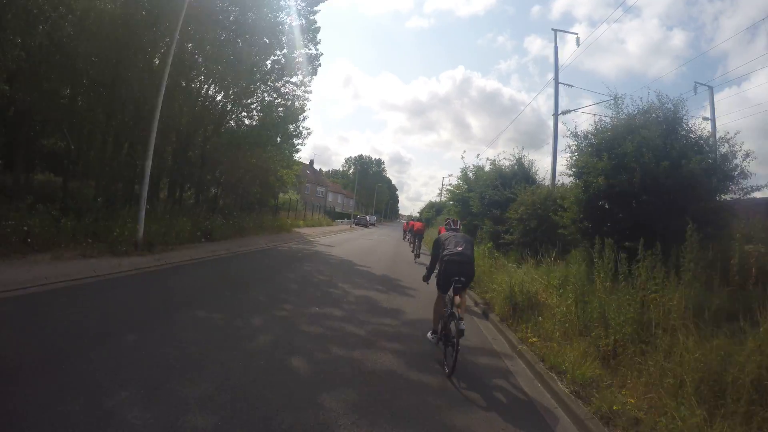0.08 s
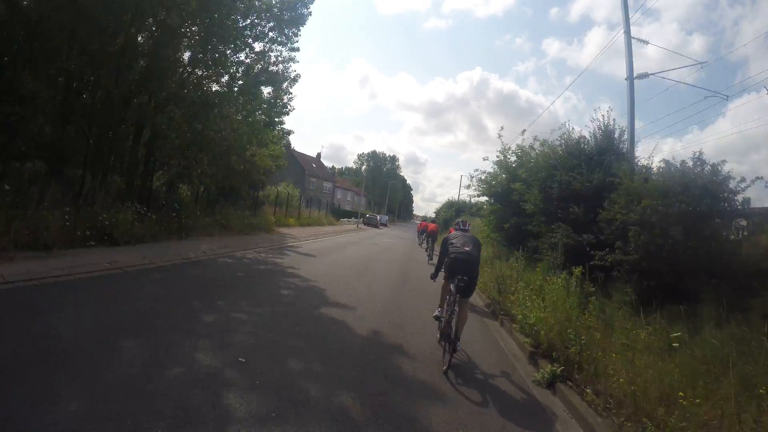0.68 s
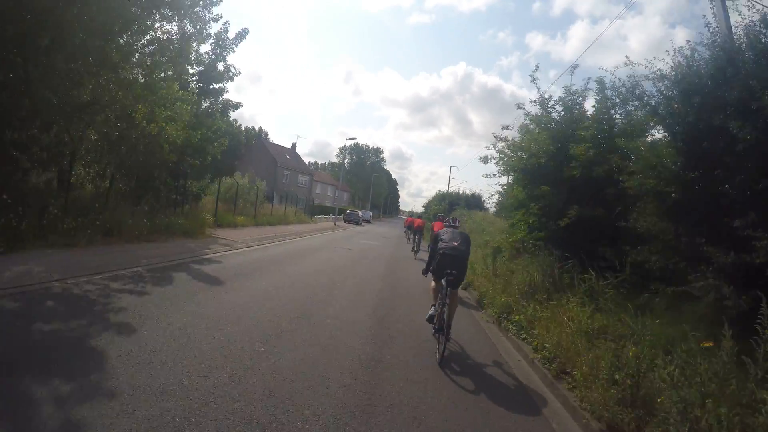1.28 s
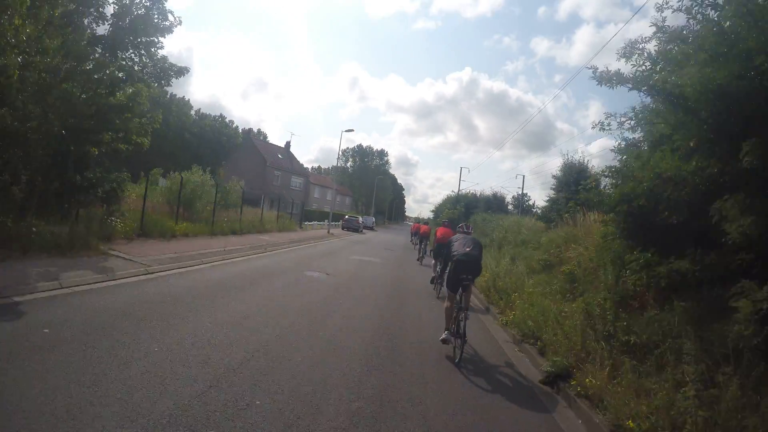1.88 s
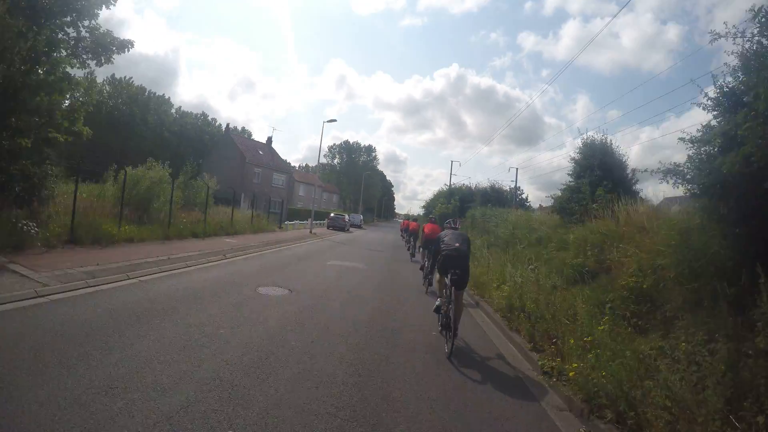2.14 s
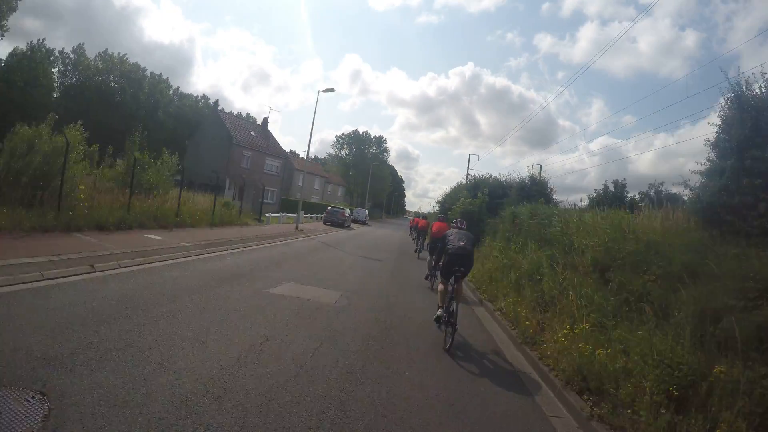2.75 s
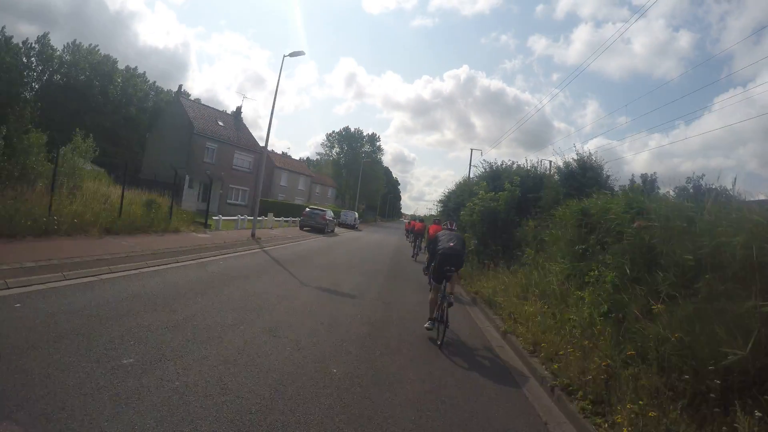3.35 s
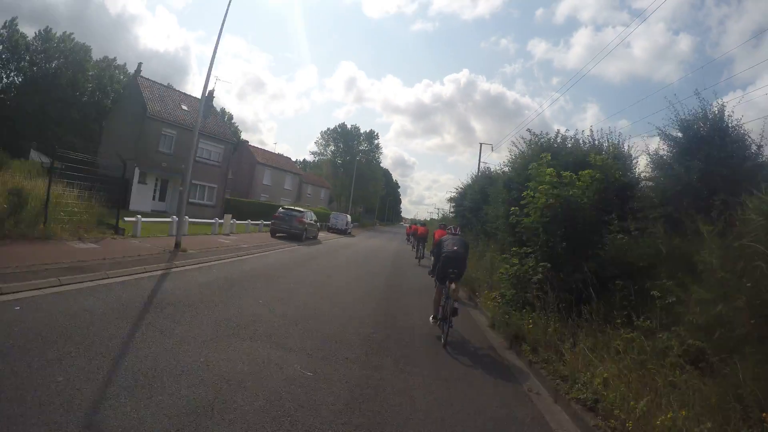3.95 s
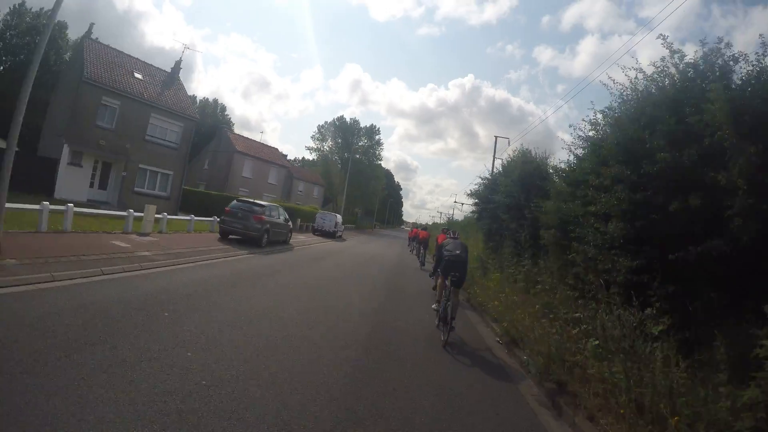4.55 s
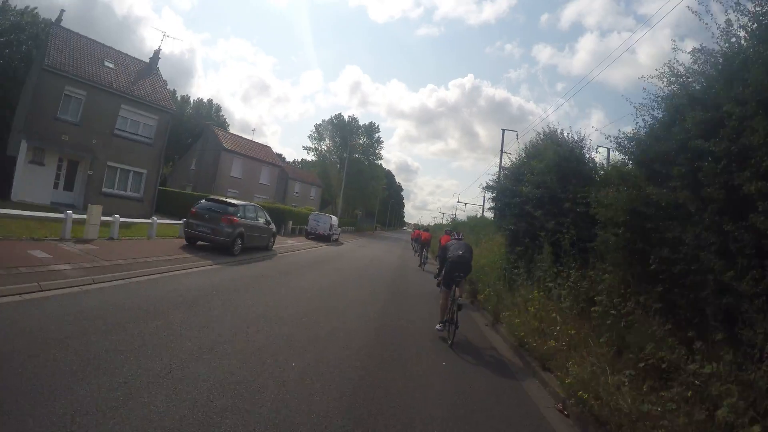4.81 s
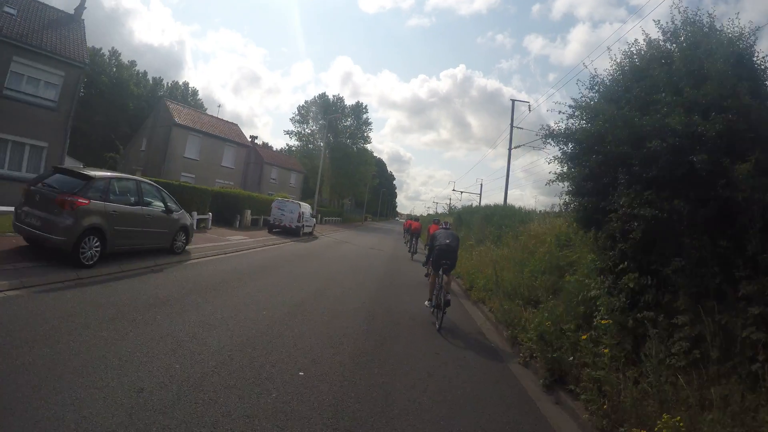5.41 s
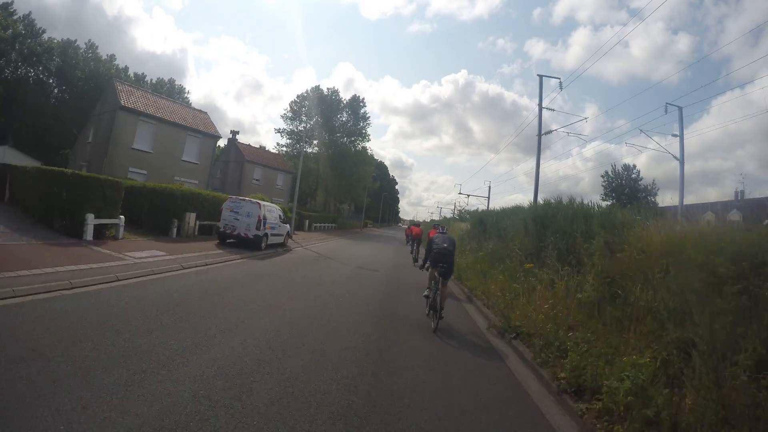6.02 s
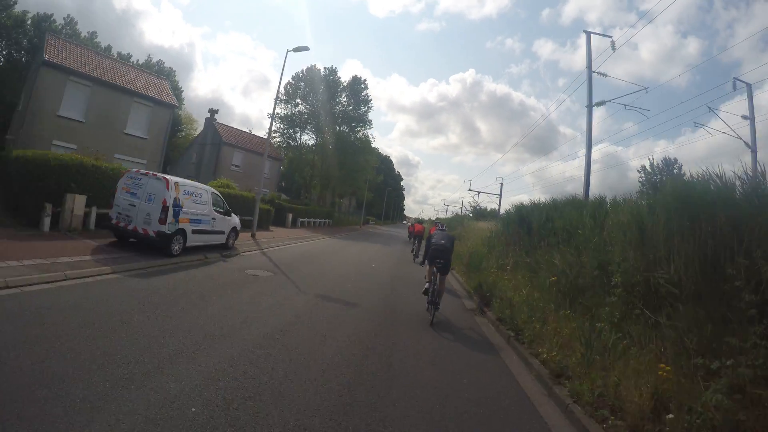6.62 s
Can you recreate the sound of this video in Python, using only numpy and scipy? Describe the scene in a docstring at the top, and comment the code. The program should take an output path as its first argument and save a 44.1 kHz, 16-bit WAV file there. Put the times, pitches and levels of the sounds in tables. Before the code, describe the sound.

Low, gusty wind buffets a microphone mounted on a moving bicycle, over the steady rush and hum of tyres on asphalt. A bright swish fades away at the start. Something close by ticks lightly on many of the wheel turns. In the second half, a few bumps make the mount clack sharply, the loudest with a strong gust. A thin hiss of air lies underneath.

```python
"""Wind buffets the microphone over a rush of tyres, and a bright swish fades away at the start.
The microphone is in a camera's plastic case, mounted on a bicycle behind a group of riders on asphalt.
Road grain drums up through the frame, and coarse patches make the tread sing. Close by, something
ticks lightly on many of the wheel turns, and late on a few bumps make the mount clack.
Underneath lie the hiss of air on the case and the camera's faint whine."""
import sys
import numpy as np
from scipy import signal
from scipy.fft import rfft, irfft
from scipy.io import wavfile
from scipy.ndimage import uniform_filter1d

SR = 44100
rng = np.random.default_rng(int(sys.argv[2]) if len(sys.argv) > 2 else 0)


def materialize(psi):
    """Save the field psi as 16-bit PCM at rate SR to the path in sys.argv[1].

    A 1-D psi becomes a single channel; in a 2-D psi each row is a channel.
    """
    bounded = np.clip(np.atleast_2d(psi).T, -1, 1)
    quanta = np.round(bounded * 32767).astype(np.int16)
    wavfile.write(sys.argv[1], SR, quanta)


N = 295029
T = np.arange(N) / SR
HZ = np.fft.rfftfreq(N, 1 / SR)


def wind(large_db=-43, small_db=-56.5, lump_db=1.0, puff_db=1.3):
    """Headwind and gusts push right on the case: large eddies come in lumps, small ones in puffs."""
    # spectra of the large and of the small eddies: f/Hz, relative level/dB
    large_spectrum = [(4, -3), (12, -4), (24, 4.5), (38, -2), (52, -10.5), (75, -26.5), (120, -38),
                      (400, -73)]
    small_spectrum = [(25, -32), (50, -0.5), (70, 0.5), (110, -6.5), (160, -14), (250, -25.5), (600, -38),
                      (2000, -69)]
    # gusts on top of the headwind: peak t/s, half length/s, large eddy level/dB, small eddy level/dB
    gusts = [(0.284, 0.094, -44, -55), (0.69, 0.061, -37, -60), (1.38, 0.47, -40.5, -64),
             (2.388, 0.1, -39, -66), (2.63, 0.093, -41, -64), (3.18, 0.12, -38.5, -51),
             (3.597, 0.19, -36.5, -51.5), (4.24, 0.11, -36, -70), (4.752, 0.13, -30.5, -44),
             (5.285, 0.23, -42, -53.5), (5.658, 0.049, -37.5, -55), (6.157, 0.23, -42, -51)]
    large_power = amp(large_db) ** 2 + sum((amp(db) * bell(s, half)) ** 2 for s, half, db, _ in gusts)
    small_power = amp(small_db) ** 2 + sum((amp(db) * bell(s, half)) ** 2 for s, half, _, db in gusts)
    buffet = amp(lump_db * drift(14)) * np.sqrt(large_power) * eddies(large_spectrum, even_s=0.13)
    flutter = amp(puff_db * drift(5)) * np.sqrt(small_power) * eddies(small_spectrum, even_s=0.22)
    return buffet + flutter


def eddies(spectrum, even_s):
    """Turbulent pressure whose strength stays even over times longer than even_s."""
    pressure = colour(noise(), spectrum)
    local_power = uniform_filter1d(pressure ** 2, int(even_s * SR))
    return unit(pressure / np.sqrt(local_power + .05))


def rolling(drum_db=-8.0, sing_db=-5.0, usual_road_db=-51, grit=0.34, chips_per_s=600):
    """Below the microphone, tread and stone chips rush, the frame drums and coarse asphalt sings."""
    # loudness of the tyres as the asphalt changes: t/s, level/dB
    asphalt = [(0.0, -50), (1.2, -50.5), (2.2, -52.5), (2.65, -50.5), (3.0, -53), (3.75, -54.5),
               (4.05, -52.5), (4.3, -53.5), (4.7, -52.5), (5.15, -53.5), (5.55, -51), (6.2, -50.5),
               (6.69, -52)]
    # coarse patches: middle t/s, half length/s, rise of the tyre level/dB, extra rise of the drumming/dB
    patches = [(0.15, 0.091, 1, 3), (1.01, 0.043, 0.6, 5), (1.43, .07, 2, -3.5), (2.787, 0.033, 2, 1),
               (3.202, 0.041, 2.5, 1), (3.356, 0.029, 3.5, 3), (4.464, 0.032, 5, 1), (6.14, 0.11, 1.5, 1),
               (6.575, 0.029, 3.5, -0.5)]
    # spectra of tyre rush, frame drumming and tread song: f/Hz, relative level/dB
    rush_spectrum = [(200, -11), (500, -12.5), (690, -9), (800, -1.5), (900, -3.5), (1030, -2.5),
                     (1450, -4.5), (2000, -2.5), (2550, -3), (3050, -12), (3600, -13), (4400, -26.5),
                     (7000, -40.5), (15000, -47)]
    drum_spectrum = [(60, -2.5), (130, 1), (220, -4), (275, -6), (312, -1), (345, 3.5), (410, -4.5),
                     (490, -2.5), (580, -7), (700, -12), (1200, -17.5), (4000, -70)]
    sing_spectrum = [(1000, -42), (1500, -12.5), (1660, 2), (1780, -3), (1920, 3.5), (2120, 0), (2450, -13),
                     (3200, -44)]
    # lower resonances of the case: f/Hz, width/Hz, boost/dB
    case_peaks = [(1670, 150, 4.5), (1920, 107, 1.5), (2035, 200, 2.5)]
    grain = drift(30)  # road grain shakes all three layers together
    patch_db = sum(db * bell(s, half) for s, half, db, _ in patches)
    shake_db = sum(db * bell(s, half) for s, half, _, db in patches)
    road = amp(np.interp(T, *np.transpose(asphalt)) + patch_db)
    chips = noise() * (rng.random(N) < chips_per_s / SR)
    rush = colour(noise() + grit * unit(chips), rush_spectrum, case_peaks) * amp(0.5 * grain)
    drum = colour(noise(), drum_spectrum) * amp(drum_db + shake_db + 1.23 * grain)
    sing = colour(noise(), sing_spectrum) * amp(sing_db + 1.6 * grain)
    coarseness = (road / amp(usual_road_db)) ** 0.94  # the song grows faster than the rush
    return road * (rush + drum + coarseness * sing)


def clacks(thump_delay_s=0.0006, thump_s=0.0031, rebound_s=0.0031, rebound_db=-17):
    """At the microphone, the mount snaps on its stop and rebounds; the case thumps and rings."""
    # bumps: t/s, click level/dB, thump level/dB, case ring gain/dB, contact time/ms
    bumps = [(4.4852, -16, -25, -29.5, 0.12), (4.7836, -12, -24, -28, 0.067),
             (4.8584, -29.5, -46, -52, 0.13), (4.9202, -26, -33, -52, 0.12),
             (5.3167, -29.5, -35, -50, 0.14)]
    # modes of the mount and of the case: f/Hz, relative level/dB, t60/s, swell time/s
    mount_modes = [(540, -10.5, 0.0085, 0.00013), (1580, -2, 0.0018, 0.0001), (1734, 10, 0.0049, 0.000098),
                   (2810, 1, 0.013, 0.0017)]
    case_modes = [(4210, 0.5, 0.0095, 0.0014), (5500, -18, 0.0079, .001)]
    out = np.zeros(N)
    t = np.arange(-64, 2048) / SR
    contact_axis_ms = 1000 * np.arange(-32, 33) / SR
    snap = ring(mount_modes, t) + amp(rebound_db) * ring(mount_modes, t - rebound_s)
    thump_age = np.maximum(t - thump_delay_s, 0) / thump_s
    thump = thump_age ** 2 * np.exp(1 - thump_age ** 2)
    for s, click_db, thump_db, ring_db, contact_ms in bumps:
        contact = np.exp(-.5 * (contact_axis_ms / contact_ms) ** 2)
        click = np.convolve(snap, contact, "same")  # a longer contact is duller
        click /= abs(click).max()
        clack = amp(click_db) * click + amp(thump_db) * thump + amp(ring_db) * ring(case_modes, t)
        add(out, s + t[0], clack)
    return out


def ticks(start_s=.1955, turn_s=.25142, quicken_s=.000507, scuff_s=0.0034):
    """One spot of the slowly quickening wheel scuffs briefly, heard through the case's resonances."""
    # turns on which the wheel catches: turn number, level/dB
    catches = [(1, -50), (2, -50.5), (5, -52), (6, -49), (9, -54.5), (10, -49), (11, -53), (13, -53.5),
               (14, -51), (15, -52.5), (17, -56), (18, -52.5), (22, -53.5), (23, -55), (26, -54)]
    # ticks out of step with the wheel: t/s, level/dB
    strays = [(1.7788, -58), (4.717, -51.5)]
    # spectrum of a tick: f/Hz, relative level/dB
    spectrum = [(800, -28), (2000, -14), (3000, -10), (3600, -4), (4080, 5.5), (4500, -15), (5000, -27),
                (5480, -3.5), (5800, -18), (6400, -16.5), (9000, -40)]
    in_step = [(start_s + turn_s * turn - quicken_s * turn ** 2 / 2, db) for turn, db in catches]
    age = np.arange(2048) / SR / scuff_s
    touch = np.zeros(N)
    for s, db in in_step + strays:
        add(touch, s, amp(db) * age * np.exp(1 - age))
    return touch * colour(noise(), spectrum)


def swish(hum_db=-7, hum_hz=1130, sink_hz=110, width_hz=140):
    """A passing rush fades with distance, its fizz first; a hollow hum in it lingers."""
    # swishes going by: nearest t/s, body level/dB, fizz level/dB
    passes = [(0.03, -43.5, -64), (5.99, -67, -70)]
    # spectra of the body and of the fizz: f/Hz, relative level/dB
    body_spectrum = [(300, -32), (800, -20), (1100, -9), (1420, -6), (1750, 1), (2300, 2), (2800, -4),
                     (3150, -18), (3550, -5.5), (4500, -25), (9500, -46), (15000, -50)]
    fizz_spectrum = [(2000, -32), (4500, -7), (6000, -1), (7900, -2), (9500, -22), (15000, -26)]
    body_gain = sum(go_by(s, db, fall_db_per_s=29.5) for s, db, _ in passes)
    fizz_gain = sum(go_by(s, db, fall_db_per_s=47) for s, _, db in passes)
    hum_gain = sum(go_by(s, db + hum_db, fall_db_per_s=18.5) for s, db, _ in passes)
    centre_hz = hum_hz - sink_hz * np.minimum(T, 1)  # sinks during the first second
    hum = hum_gain * unit(drift(width_hz) * tone(centre_hz))
    body = body_gain * colour(noise(), body_spectrum)
    fizz = fizz_gain * colour(noise(), fizz_spectrum)
    return hum + body + fizz


def air(hiss_db=-60, flutter_db=0.74):
    """Airflow hisses steadily in the case around the microphone."""
    # spectrum of the airflow: f/Hz, relative level/dB
    spectrum = [(300, 5), (2500, -6), (3900, 4.5), (4450, -2), (4900, -3), (6200, -2.5), (7200, -5.5),
                (8500, -9), (10000, -11.5), (12500, -13.5), (15000, -14.5)]
    # upper resonances of the case: f/Hz, width/Hz, boost/dB
    case_peaks = [(3453, 490, 9.5), (4110, 420, 7.4), (4770, 160, 2.6), (5370, 510, 6.2)]
    return amp(hiss_db + flutter_db * drift(50)) * colour(noise(), spectrum, case_peaks)


def whine(waver_hz=16, switch_hz=15, floor=.2):
    """The camera's electronics, beside the microphone, switch thin tones between louder and softer."""
    # tones of the electronics: f/Hz, level/dB
    partials = [(7357, -84.5), (12227, -107), (14700, -85)]
    busy = uniform_filter1d(1. * (np.sin(2 * np.pi * switch_hz * T) < 0), 128)
    tones = sum(amp(db) * unit(tone(hz + waver_hz * drift(60))) for hz, db in partials)
    return tones * unit(busy + floor)


def amp(db):
    """Decibels to gain."""
    return 10 ** (np.asarray(db) / 20)


def unit(x):
    """Scales to rms 1."""
    return x / np.sqrt(np.mean(x ** 2) + 1e-20)


def noise():
    """White noise for the whole scene."""
    return rng.standard_normal(N)


def tone(hz):
    """A sine that follows a frequency curve."""
    return np.sin(2 * np.pi * np.cumsum(hz) / SR)


def drift(rate_hz):
    """Random wander of rms 1, up to about the given rate."""
    return unit(irfft(rfft(noise()) * np.exp(-(HZ / rate_hz) ** 2), N))


def bell(s, half_s):
    """A smooth swell of height 1 around time s."""
    return np.exp(-.5 * ((T - s) / half_s) ** 2)


def go_by(s, db, fall_db_per_s):
    """Gain that peaks at time s and falls away on either side."""
    return amp(db - fall_db_per_s * abs(T - s))


def colour(x, spectrum, peaks=()):
    """Filters x by a smooth spectrum with resonances on top; rms 1."""
    f, db = np.transpose(spectrum)
    shape_db = np.interp(np.log(HZ + 1), np.log(f + 1), db)
    for hz, width, peak_db in peaks:
        shape_db += peak_db * .5 ** ((2 * (HZ - hz) / width) ** 2)
    return unit(irfft(rfft(x) * amp(shape_db), N))


def ring(modes, t):
    """A sum of modes that swell briefly and die, silent before t = 0."""
    t = np.maximum(t, 0)
    out = np.zeros(len(t))
    for hz, db, t60, swell_s in modes:
        onset = 1 - np.exp(-(t / swell_s) ** 2)
        out += onset * amp(db - 60 * t / t60) * np.sin(2 * np.pi * hz * t)
    return out


def add(mix, s, sound):
    """Mixes a sound in at time s."""
    part = mix[max(round(s * SR), 0):][:len(sound)]
    part += sound[:len(part)]


def scene():
    """Everything meets at one microphone riding on the bicycle."""
    return (wind() + rolling() + swish() + air() + clacks() + ticks() + whine())[None]


def record(dry):
    """The camera cuts off the highest treble."""
    edge_hz = 15150
    lowpass = signal.firwin(511, edge_hz, window=("kaiser", 9), fs=SR)
    return signal.oaconvolve(dry, lowpass[None], "same")


dry = scene()
out = record(dry)
materialize(out)
```